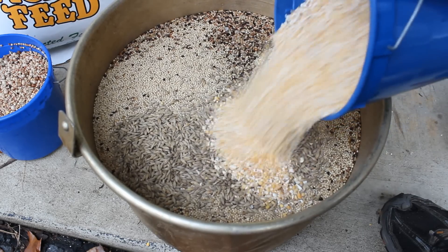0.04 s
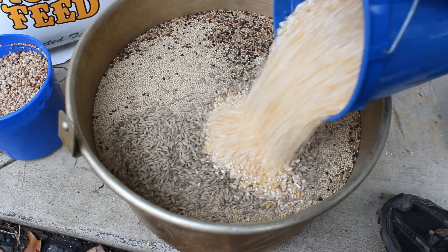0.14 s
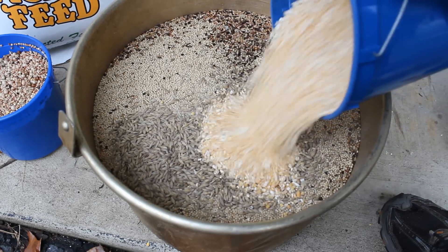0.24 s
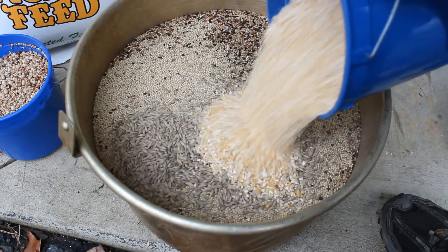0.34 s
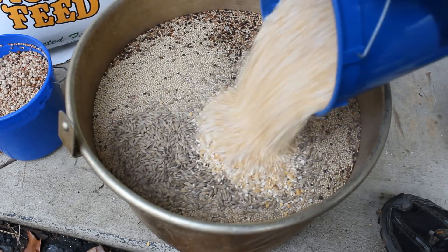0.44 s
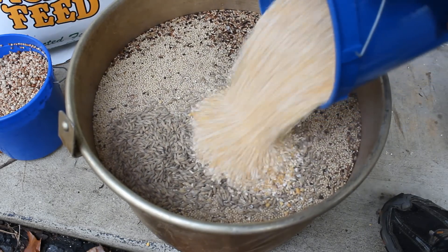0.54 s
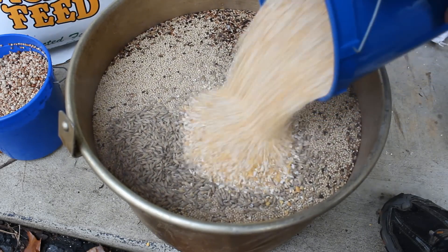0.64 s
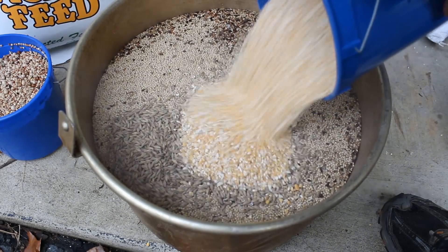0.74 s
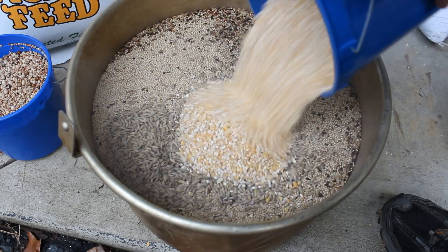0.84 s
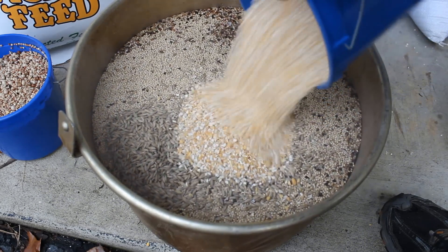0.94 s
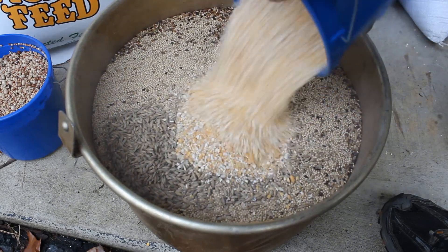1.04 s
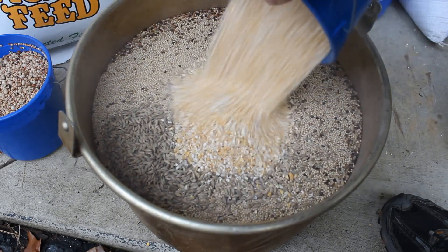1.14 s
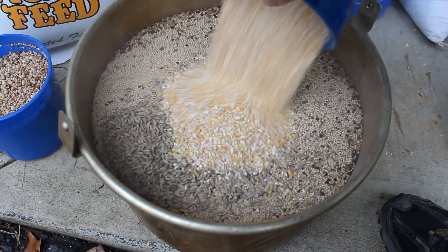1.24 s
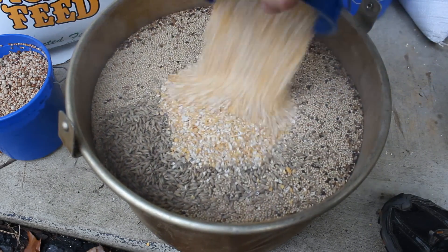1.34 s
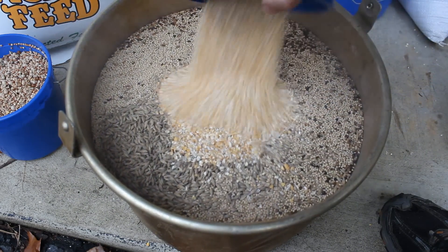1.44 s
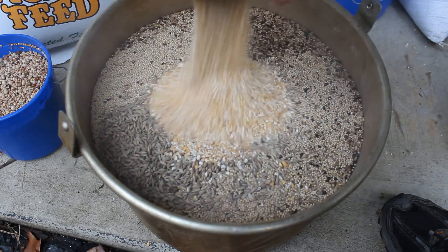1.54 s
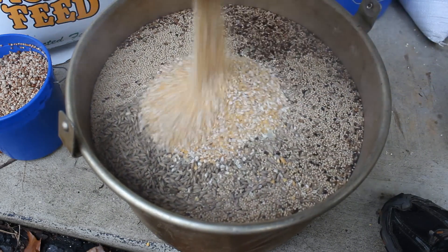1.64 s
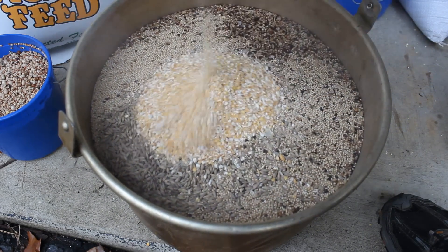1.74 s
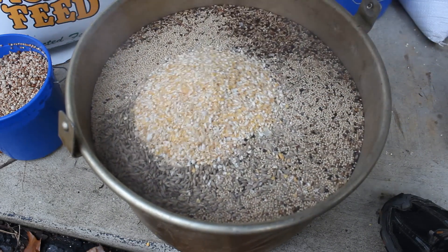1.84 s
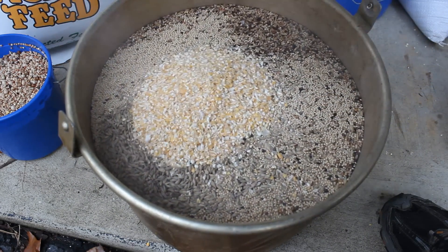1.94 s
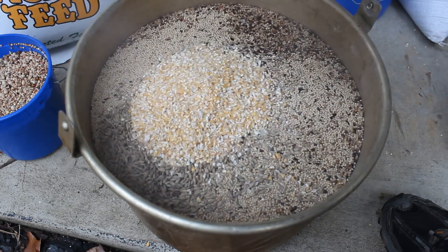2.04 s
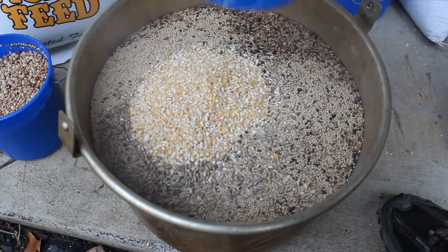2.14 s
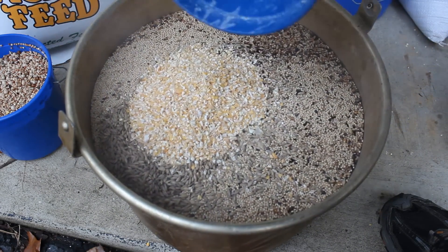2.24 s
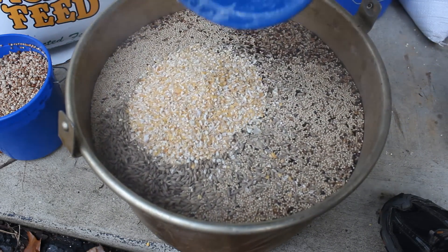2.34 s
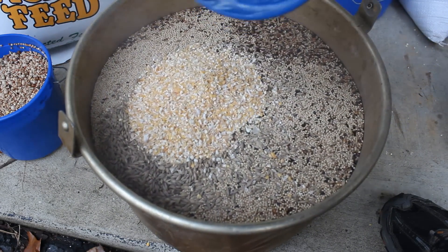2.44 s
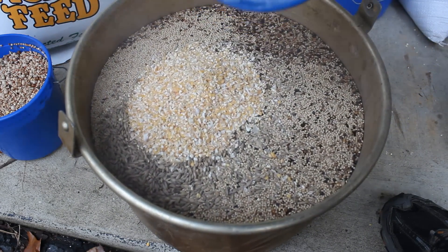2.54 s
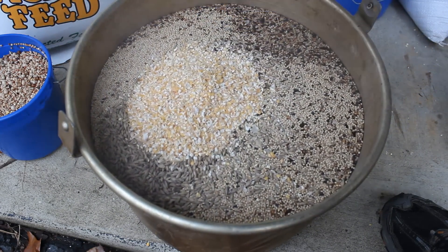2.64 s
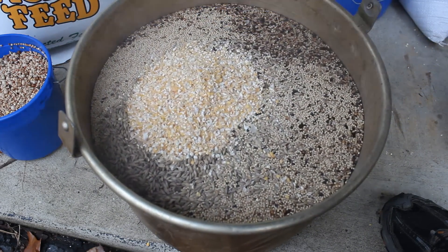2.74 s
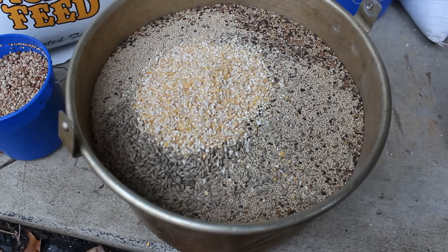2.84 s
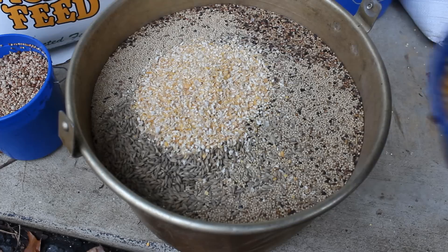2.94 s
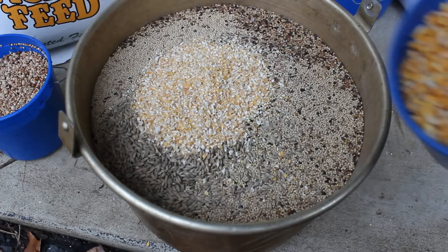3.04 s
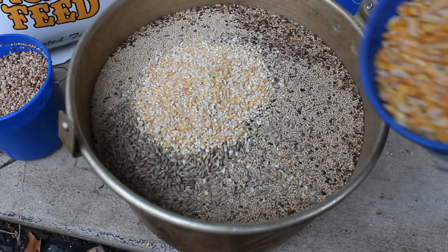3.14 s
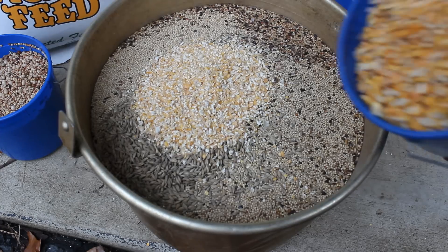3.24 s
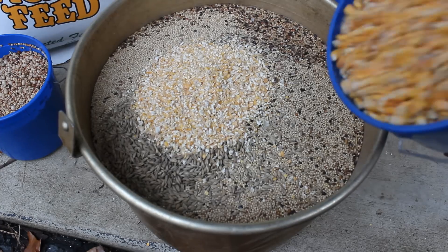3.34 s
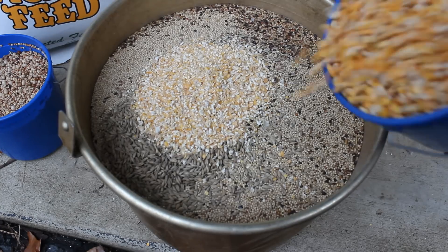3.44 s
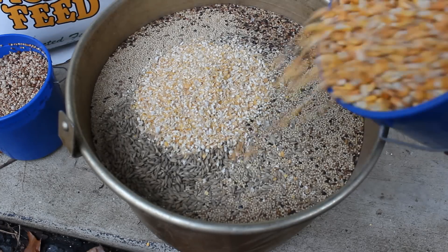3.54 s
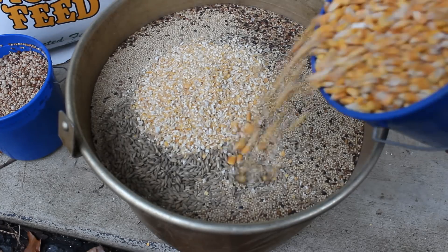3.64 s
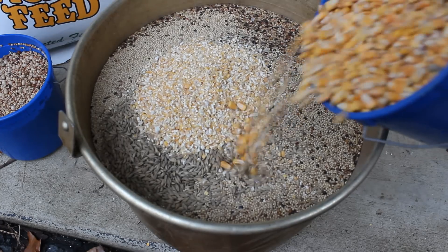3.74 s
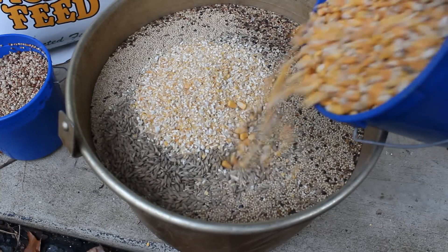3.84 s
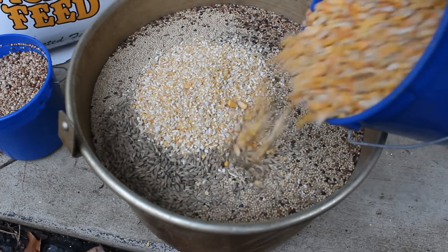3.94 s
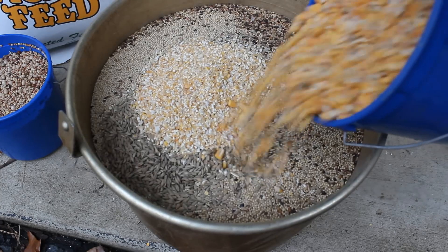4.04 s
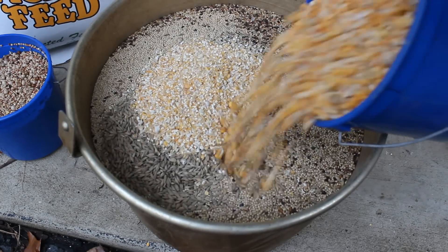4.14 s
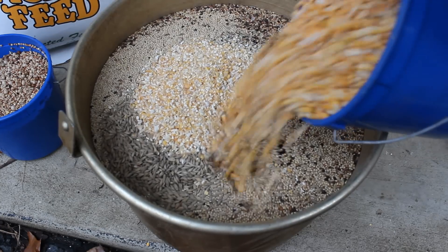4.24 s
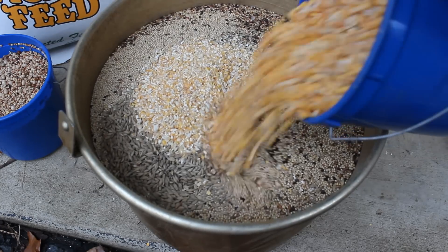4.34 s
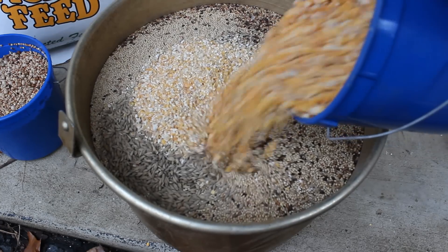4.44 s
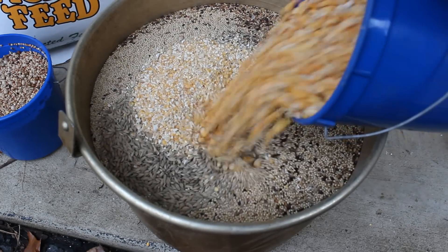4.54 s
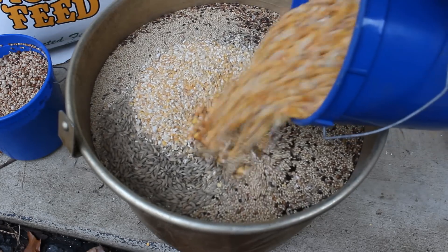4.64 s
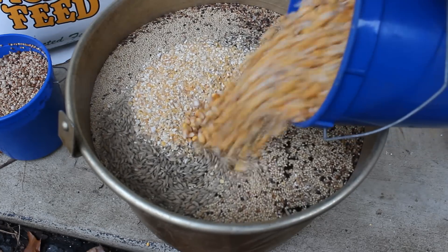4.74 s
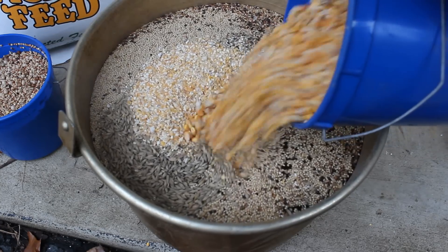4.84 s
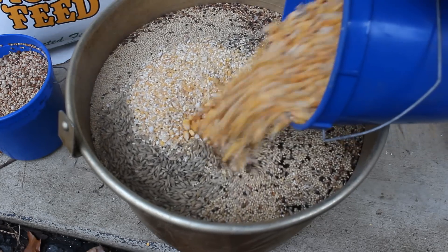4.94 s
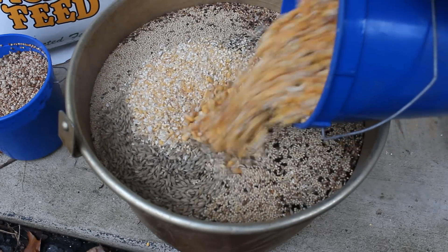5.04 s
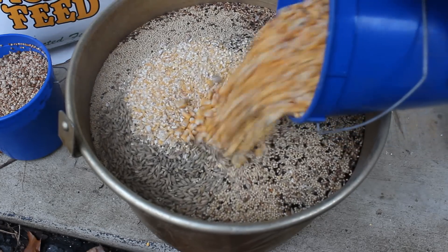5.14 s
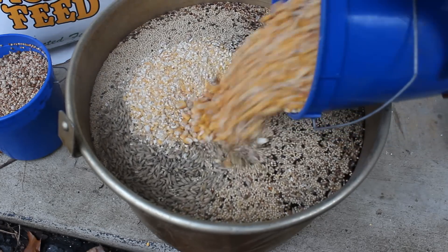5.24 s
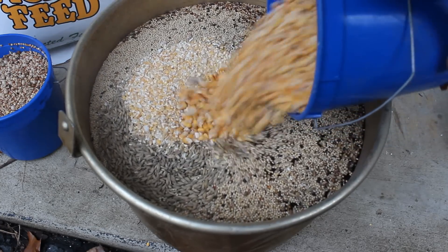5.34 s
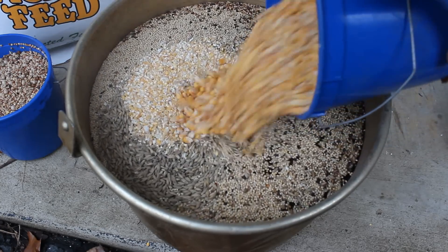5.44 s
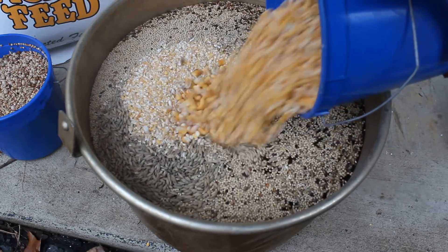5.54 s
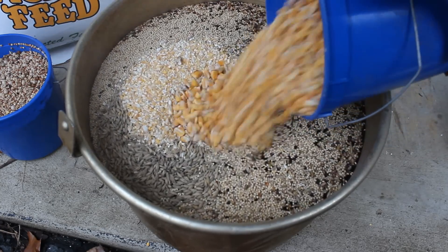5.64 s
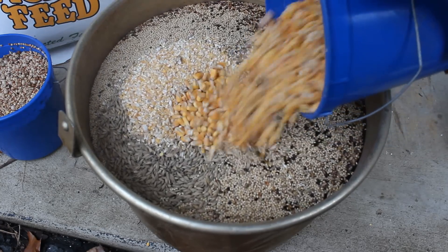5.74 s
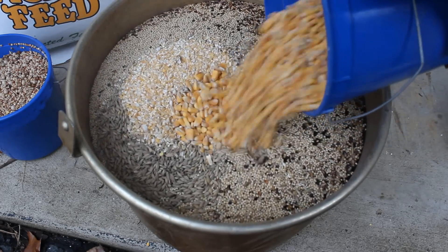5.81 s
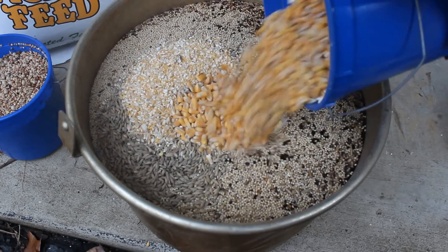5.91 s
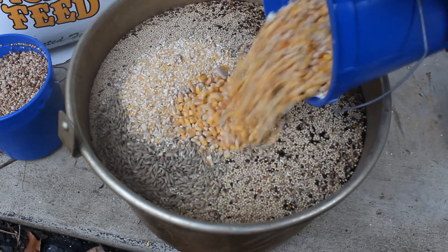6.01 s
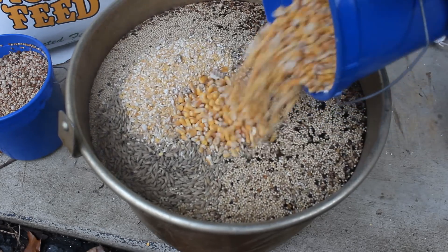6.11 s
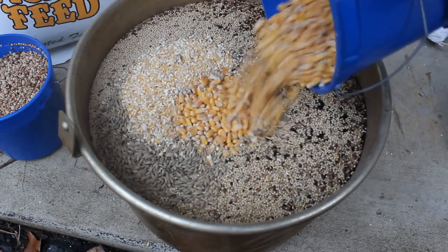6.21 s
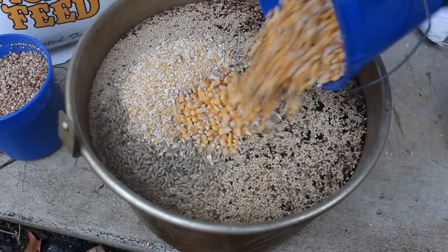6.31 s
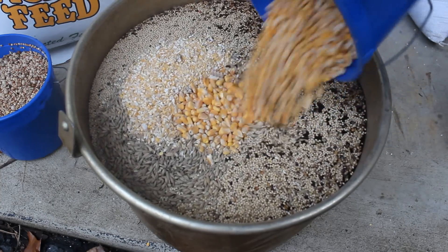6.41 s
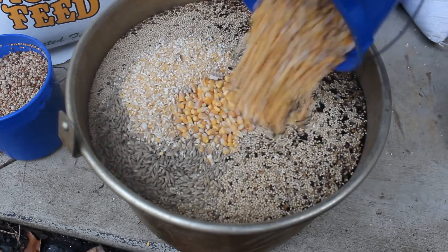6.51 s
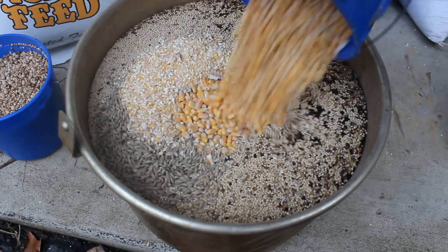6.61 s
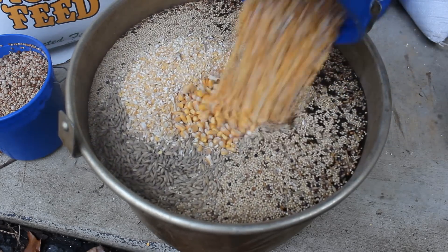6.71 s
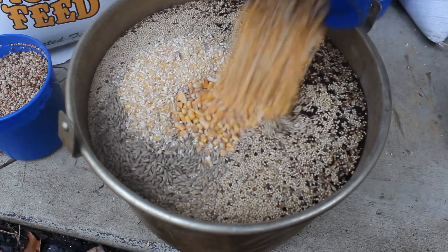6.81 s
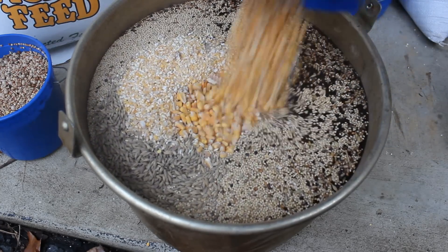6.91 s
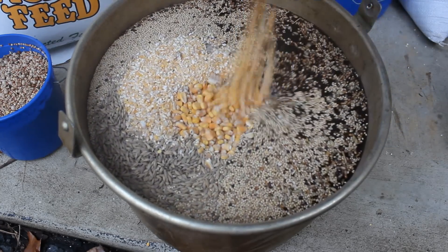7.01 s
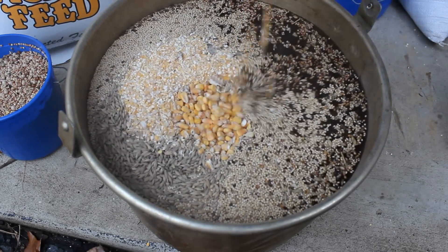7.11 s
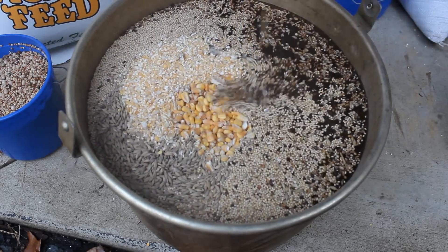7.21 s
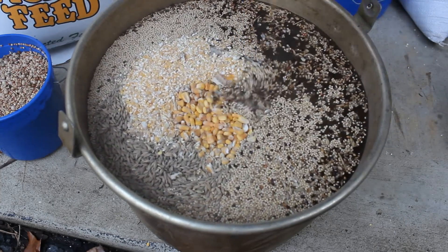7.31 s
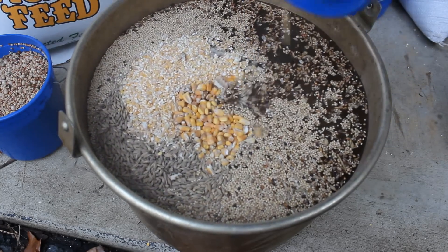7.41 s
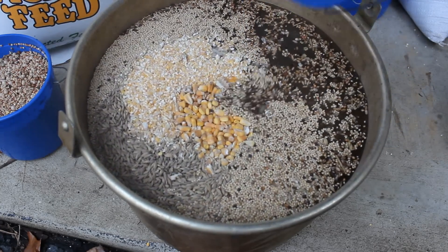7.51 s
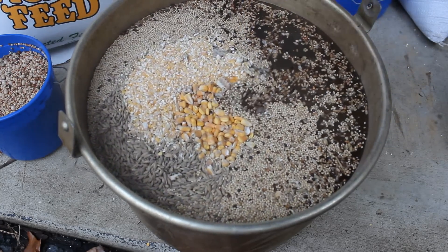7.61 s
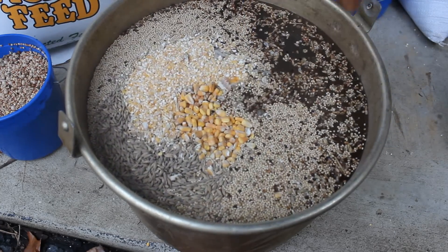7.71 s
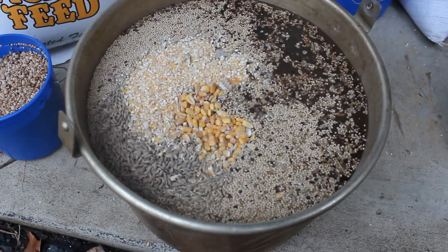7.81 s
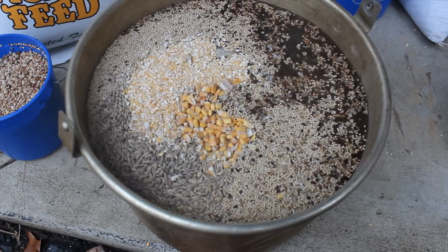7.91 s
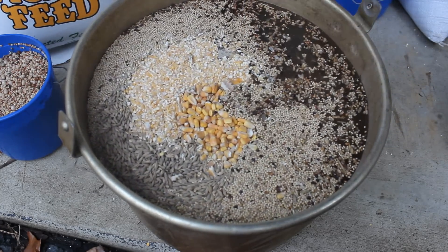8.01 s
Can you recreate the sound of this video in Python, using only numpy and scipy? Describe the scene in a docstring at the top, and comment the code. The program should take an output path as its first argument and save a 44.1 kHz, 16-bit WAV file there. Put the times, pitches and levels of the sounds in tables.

```python
"""A hissing pour of cracked grain slides down a plastic bucket into a metal pot half full of seed, which hums on.
A second bucket of whole kernels follows, coarser and more rattling; loose kernels knock about between pours.
Grain is filtered noise blurred over countless tiny damped rings; knocks ring the wall modes of the bucket.
Crickets (a drifting narrow band) and far traffic (filtered noise) fill the yard; one microphone with a limiter."""
import sys
import numpy as np
from scipy import signal
from scipy.fft import rfft, irfft, next_fast_len
from scipy.io import wavfile
from scipy.ndimage import uniform_filter1d, minimum_filter1d, map_coordinates

SR = 44100
rng = np.random.default_rng(int(sys.argv[2]) if len(sys.argv) > 2 else 0)


def waveform_to_disk(signal):
    """Save audio, clipped to [-1, 1], as 16-bit WAV at the path in sys.argv[1]."""
    frames = np.transpose(np.atleast_2d(signal))
    scaled = np.clip(frames, -1, 1) * 32767
    samples = np.round(scaled).astype(np.int16)
    wavfile.write(sys.argv[1], SR, samples)


def to_linear_factor(level_db):
    """Convert decibel levels (scalar or array-like) to linear amplitude factors."""
    exponent = np.asarray(level_db, float) / 20
    return 10 ** exponent


N = 355754  # length in samples


def unit(x):
    """Scaled to rms 1."""
    return x / np.sqrt(np.mean(x ** 2) + 1e-20)


def curves(rows):
    """One value per sample for each column after the time."""
    start_s, *columns = np.transpose(rows)
    return [np.interp(np.arange(N) / SR, start_s, column) for column in columns]


def wobble(rate):
    """A smooth random curve, rate knots a second."""
    knots = rng.standard_normal(400 + N // 100)
    return map_coordinates(knots, [np.arange(N) * rate / SR])


def coloured(x, spectrum):
    """x through a causal (minimum-phase) filter with the (Hz, dB) spectrum."""
    size = 2 * next_fast_len(N // 2 + 4096)
    hz, db = np.transpose(spectrum)
    bins_hz = np.fft.rfftfreq(size, 1 / SR)
    gain_db = np.interp(np.log(bins_hz + 1), np.log(hz + 1), db)
    cepstrum = irfft(np.log(to_linear_factor(gain_db)), size)
    # folding the cepstrum forward makes the filter causal
    cepstrum[1:size // 2] *= 2
    cepstrum[size // 2 + 1:] = 0
    return irfft(rfft(x, size) * np.exp(rfft(cepstrum)), size)[:N]


def noise(spectrum):
    """Steady noise of rms 1 with the (Hz, dB) spectrum."""
    return unit(coloured(rng.standard_normal(N), spectrum))


def tone(hz, width_hz, drive):
    """A moving resonance: the drive, smoothed to the width, carried at the pitch."""
    lowpass = [(0, 0), (width_hz / 2, -3), (3 * width_hz, -22), (20000, -60)]
    slow = [coloured(drive * rng.choice([-1, 1], N), lowpass) for _ in "ab"]
    phase = 2 * np.pi * np.cumsum(hz) / SR
    return unit(slow[0] * np.cos(phase) + slow[1] * np.sin(phase))


def kernels(count, low_hz, high_hz, turns, spread_db):
    """Scattered collisions, each a damped ring of a few cycles at its own pitch and size."""
    when, pitch, size = rng.random((3, count, 1))
    hz = low_hz * (high_hz / low_hz) ** pitch
    k = np.arange(160)
    ring = np.sin(2 * np.pi * hz * k / SR) * np.exp(-hz * k / SR / turns)
    # high rings are short, so louder for an even spectrum; a few collisions are far bigger than the rest
    ring *= hz / low_hz * to_linear_factor(-spread_db * np.log(size + 0.045))
    place = (when * N + k).astype(int)
    return unit(np.bincount(place.ravel(), ring.ravel())[:N])


def stream(single, grains, spectrum):
    """A blur of countless contacts with single kernels standing out of it."""
    single = np.clip(single, 0, 1)
    blur = np.sqrt(1 - single) * noise(spectrum)
    return blur + np.sqrt(single) * unit(coloured(grains, spectrum))


# spectrum of the far traffic and air: hz [Hz], level_db [dB]
YARD_SPECTRUM = [(20, -31), (55, -5), (105, -1.5), (150, -9), (225, -6.5), (350, -11), (760, -12),
                 (1200, -17), (2000, -21.5), (3000, -23.5), (5000, -55), (9000, -41), (16000, -42)]
# heard level of the traffic and air, which dips twice during the second pour: start_s [s], level_db [dB]
YARD_LEVEL = [(0.0, -42), (3.39, -41.5), (4.72, -46.5), (5.73, -40), (7.05, -46), (7.86, -40), (8.07, -42)]
# drift of the cricket band: start_s [s], pitch_hz [Hz]
CRICKET_PITCH = [(2, 4300), (2.3, 4100), (2.6, 4180), (3.05, 4140)]


def yard():
    """Far traffic and air, and crickets shimmering in a narrow band that drifts."""
    level_db, pitch_hz = curves(YARD_LEVEL)[0], curves(CRICKET_PITCH)[0]
    air = to_linear_factor(level_db + 0.59 * wobble(6.8)) * noise(YARD_SPECTRUM)
    shimmer_db = -53 + 1.8 * wobble(40)
    return air + to_linear_factor(shimmer_db) * tone(pitch_hz, 300, np.ones(N))


# wall modes of the metal pot: pitch_hz [Hz], level_db [dB, before the fade-in], t60_s [s]
POT_MODES = [(488, -43, 5.5), (557, -51, 4.5)]


def pot():
    """The last of the cracked grain lands at once and shakes the metal wall, which hums on, wavering a little."""
    slump_s, fade_in_s = 1.74, 0.03
    t = np.clip(np.arange(N) / SR - slump_s, 0, None)
    hum = np.zeros(N)
    for pitch_hz, level_db, t60_s in POT_MODES:
        hum += to_linear_factor(level_db - 60 * t / t60_s + 0.85 * wobble(2.5)) * np.sin(2 * np.pi * pitch_hz * t)
    return hum * (1 - np.exp(-t / fade_in_s))


# a bucket bumped by hand: start_s [s], level_db [dB, of the four-note drum before it decays]
HAND_THUMPS = [(2.869, -24), (3.183, -19.5), (3.25, -23)]


def thumps():
    """A hand on the bucket gives a dull, short drum note."""
    out, t = np.zeros(N + SR), np.arange(SR // 8) / SR
    drum = np.mean([np.sin(2 * np.pi * hz * t) for hz in (402, 467, 630, 723)], axis=0)
    for start_s, level_db in HAND_THUMPS:
        out[round(start_s * SR):][:len(t)] += to_linear_factor(level_db - 60 * t / 0.052) * drum
    return out[:N]


# kernels on kernels, heard singly: start_s [s], level_db [dB, click peak before colouring]
KERNEL_TICKS = [(2.3535, -27), (2.3735, -32), (2.403, -35), (2.524, -41), (2.544, -38), (2.8714, -15),
                (3.3284, -42), (3.6765, -36), (3.7262, -26), (3.766, -24), (3.7824, -18.5), (3.7976, -18.5),
                (3.819, -19), (3.8412, -29), (3.8584, -22), (3.876, -19.5), (3.917, -27), (3.9426, -15),
                (4.204, -19.5), (4.317, -13), (4.4625, -21), (4.5156, -16), (4.631, -15), (6.3919, -14),
                (7.307, -24), (7.324, -34), (7.367, -32), (7.4483, -24), (7.5495, -30), (7.8224, -35)]
# the first kernels over the rim: start_s [s], length_s [s], level_db [dB, about the loudest click]
RIM_DRIBBLE = (4.3, 0.92, -26)


def ticks():
    """Hard kernels meeting in the air or on the heap: a bright click with a faint skitter."""
    scatter_db, contact_db = 8, -32.5  # spread of the dribble, the tick that starts each single knock
    out, t = np.zeros(N + SR), np.arange(SR // 40) / SR
    dribble_s, length_s, top_db = RIM_DRIBBLE
    dribble = [(dribble_s + length_s * u, top_db + scatter_db * np.log(v + 0.01))
               for u, v in rng.random((24, 2))]
    contacts = [(start_s, level_db + contact_db) for start_s, level_db, _ in SINGLE_KNOCKS]
    for start_s, level_db in KERNEL_TICKS + dribble + contacts:
        envelope = to_linear_factor(-60 * t / 0.003) + 0.2 * to_linear_factor(-60 * t / 0.03)
        click = envelope * rng.choice([-1, 1], len(t))
        out[round(start_s * SR):][:len(t)] += to_linear_factor(level_db) * click / np.abs(click).max()
    return coloured(out[:N], PATTER_SPECTRUM)


# kernels and handle on plastic: start_s [s], level_db [dB, peak before colouring], loudest_hz [Hz]
SINGLE_KNOCKS = [(1.8457, -27, 4020), (1.9487, -25, 1090), (2.311, -17.5, 3600), (2.342, -14, 1920),
                 (2.376, -13.5, 4150), (2.4026, -21, 2770), (2.4398, -28, 3320), (2.4748, -31, 2970),
                 (2.662, -22, 3790), (2.726, -21, 2650), (2.7894, -25, 3040), (2.8723, -0.5, 2040),
                 (2.9136, -18.5, 3000), (2.9426, -5.5, 1150), (3.185, -19.5, 1090), (3.2512, -21.5, 1405),
                 (3.353, -13, 3230), (3.361, -9, 2660), (3.3827, -16, 2660), (3.4173, -2, 2740),
                 (3.4332, -3, 2680), (3.4506, 2, 2680), (3.486, -4, 2830), (3.4966, -2.5, 2790),
                 (3.5499, -4.5, 3260), (3.5669, -10, 3030), (3.595, -13, 2920), (3.677, -8, 2220),
                 (3.751, -11, 2780), (3.783, -12.5, 4080), (3.797, -16, 4270), (4.187, -8, 2820),
                 (4.1999, -4.5, 2530), (4.3158, -13, 3700), (4.491, -14, 2950), (4.5026, -6.5, 3280),
                 (4.6044, -8.5, 3040), (4.648, -8, 2890), (4.756, -11, 3800), (7.315, -4, 2430),
                 (7.351, -8.5, 3320), (7.3582, -0.5, 3370), (7.3659, -2, 2900), (7.406, -10, 3350),
                 (7.42, -2, 2970), (7.4496, -10.5, 2780), (7.4858, -9, 2400), (7.495, -3, 1174),
                 (7.67, -18, 3540), (7.7413, -18, 3060), (7.7596, -9.5, 3270), (7.7705, -7, 3240),
                 (7.808, -4, 2060), (7.864, -15, 3090), (7.875, -15, 3090), (7.9047, -6.5, 3120),
                 (7.943, -14, 996), (7.9937, -17.5, 2650), (8.0008, -8, 1016), (8.0525, -18, 2580),
                 (8.0624, -14, 1940)]
# loose kernels shaken in a bucket: start_s [s], length_s [s], rustle_db [dB],
# knock_db [dB, about the loudest knock], ringing_hz [Hz]
RATTLES = [(2.326, 0.16, -40, -14.5, 3100), (2.495, .33, -48.5, -25, 3100), (3.358, .3, -29, -12, 2690),
           (4.052, .8, -53, -17, 3100), (7.27, 0.33, -34.5, -19, 1200), (7.715, 0.28, -47, -28, 2900)]


def blows():
    """The single knocks, and a random handful for each rattle."""
    scatter_db = 8
    hits = list(SINGLE_KNOCKS)
    for start_s, length_s, _, knock_db, ringing_hz in RATTLES:
        for u, v, w in rng.random((12, 3)):
            level_db = knock_db + scatter_db * np.log(v + 0.011)
            hits.append((start_s + length_s * u, level_db, ringing_hz * (0.96 + 0.4 * w)))
    return hits


# wall modes of the plastic bucket: pitch_hz [Hz], level_db [dB], both varied at each blow
BUCKET_MODES = [(1000, 0), (1200, 14.5), (1500, 16.5), (2020, 21.5), (2430, 13.5), (2770, 22), (3270, 18.5),
                (3600, -1), (4200, -3), (4850, 4), (5300, -44), (6600, -18)]
# a light kernel moves little low air: hz [Hz], level_db [dB]
CLACK_SPECTRUM = [(200, -14), (700, -11.5), (1000, -6), (5000, 4.5), (8000, -3), (16000, -16)]


def knocks(hits):
    """Each blow is a sharp contact and a short rattle, ringing the damped wall modes near its loudest pitch."""
    out, t = np.zeros(N + SR), np.arange(SR // 12) / SR
    mode_hz, mode_db = np.transpose(BUCKET_MODES)[:, :, None]
    for start_s, level_db, loudest_hz in hits:
        near_db = -5 * np.abs(np.log2(mode_hz / loudest_hz))
        vary_level, vary_pitch = rng.standard_normal((2, len(BUCKET_MODES), 1))
        # high modes die sooner: t60 is 28 / Hz seconds
        ring = to_linear_factor(mode_db + near_db + 3.5 * vary_level - 60 * t * mode_hz / 28)
        ring = ring * np.sin(2 * np.pi * mode_hz * (1 + 0.04 * vary_pitch) * t)
        envelope = to_linear_factor(-60 * t / 0.0024) + 0.41 * to_linear_factor(-60 * t / 0.043)
        rattle = envelope * rng.choice([-1, 1], len(t))
        blow = signal.fftconvolve(rattle, ring.sum(0))[:len(t)] + 0.22 * rattle
        out[round(start_s * SR):][:len(t)] += to_linear_factor(level_db) * blow / np.abs(blow).max()
    return coloured(out[:N], CLACK_SPECTRUM)


# low spectrum of the heap under the falling stream: hz [Hz], level_db [dB]
THUD_SPECTRUM = [(150, -31), (330, -15), (450, 3.5), (600, -5.5), (800, -2), (1200, -44)]


def thud(patter_db, thick, clumps):
    """The weight of the stream thuds on the heap, far more when it is thick."""
    level_db = patter_db - 24 + 24 * thick + 0.98 * clumps
    return to_linear_factor(level_db) * noise(THUD_SPECTRUM)


# bright spectrum of kernel on kernel: hz [Hz], level_db [dB]
PATTER_SPECTRUM = [(1500, -25), (4000, 11.5), (7000, 12.5), (10000, 8), (13000, 10), (15800, 10),
                   (18000, 9.5)]


def patter(single):
    """Kernels fall on the heap in tiny bright clicks."""
    grains = kernels(count=11000, low_hz=5300, high_hz=15900, turns=0.79, spread_db=4.0)
    return stream(single, grains, PATTER_SPECTRUM)


# air in the bucket: hz [Hz], level_db [dB]
HOLLOW_SPECTRUM = [(500, -30.5), (850, -3), (1150, 1), (1500, -0.5), (2000, -0.5), (3000, -55)]


def hollow(single, slide, air_hz, air_db):
    """The air in the bucket booms softly behind the slide, with one tone that the slide drives."""
    grains = kernels(count=4000, low_hz=860, high_hz=1890, turns=2.0, spread_db=2.5)
    return stream(single, grains, HOLLOW_SPECTRUM) + to_linear_factor(air_db) * tone(air_hz, 130, slide)


# kernels rubbing on plastic: hz [Hz], level_db [dB]
SLIDE_SPECTRUM = [(900, -30.5), (1700, -15.5), (2400, -5.5), (3250, -5), (4300, -8.5), (5500, -14),
                  (7500, -20.5), (11000, -65), (16000, -26)]


def rubbing(single):
    """Kernels slide over the plastic in a hiss of small rings."""
    grains = kernels(count=9000, low_hz=1410, high_hz=7160, turns=1.65, spread_db=4.0)
    return stream(single, grains, SLIDE_SPECTRUM)


def sliding(rub, second, wall_hz, wall_db):
    """The rubbing sets two wall tones ringing; cracked grain is smaller and hisses higher."""
    wall = tone(wall_hz, 170, rub) + 0.47 * tone(0.72 * wall_hz, 190, rub)
    slide = rub + to_linear_factor(wall_db) * wall
    fine = to_linear_factor(-8.5) * tone(np.full(N, 5010), 1500, slide)
    return slide + (1 - second) * fine


# one row a bucket, when full and when empty: wall_hz [Hz], wall_db [dB against the slide],
# air_hz [Hz], air_db [dB against the hollow]
FULL_TONES = [(3000, -11, 1150, -20), (3045, -11.5, 1520, -5.5)]
EMPTY_TONES = [(3476, -3.5, 1180, 2.5), (3116, -6.5, 1190, -3.5)]
# one row a bucket: full_db, empty_db [dB, hollow against the slide],
# lone [share of single kernels in a thin stream, 0-1]
GRAIN_KINDS = [(-5.5, -12.5, 0.27), (-9, -4.5, 0.92)]
# one row a bucket, the time it drains: start_s [s], end_s [s]
DRAIN_TIMES = [(0, 1.75), (4, 7.1)]


def draining(second):
    """As a bucket empties its tones and hollow change; the tone levels change most near the end of a pour."""
    t = np.arange(N) / SR
    start_s, end_s = np.array(DRAIN_TIMES)[second].T
    emptied = np.clip((t - start_s) / (end_s - start_s), 0, 1)
    full, empty = np.array(FULL_TONES)[second].T, np.array(EMPTY_TONES)[second].T
    full_db, empty_db, lone = np.array(GRAIN_KINDS)[second].T
    wall_hz, air_hz = (full + (empty - full) * emptied)[::2]
    wall_db, air_db = (full + (empty - full) * emptied ** 5.2)[1::2]
    hollow_db = full_db + (empty_db - full_db) * emptied
    return wall_hz, wall_db, air_hz, air_db, hollow_db, lone


# one list a pour: start_s [s], slide_db [dB, on plastic], patter_db [dB, fall on the heap],
# thick [thickness of the stream, 0-1]
POUR_COURSES = [
    [(0, -39, -36.5, 0.3), (.31, -41.5, -40.5, 0.3), (.5, -37, -39.5, 0.4), (.6, -31.5, -36, 0.57),
     (.96, -30.5, -36.5, 0.64), (1.3, -21, -29.5, 0.56), (1.62, -23.5, -29, 0.47), (1.77, -29, -36, 0.73),
     (1.88, -59.5, -46.5, 0), (2.02, -63, -62, 0.2)],
    [(3.1, -55, -63, .5), (3.3, -52, -50, 0.3), (3.39, -36, -43, 0), (3.5, -18.5, -28, 0.07),
     (3.62, -30, -44, 0), (3.79, -34, -37, 0.24), (4.11, -30, -37, 0.18), (4.25, -25, -26.5, 0.33),
     (4.72, -24.5, -26.5, 0.24), (5.12, -22, -23, 0.41), (5.39, -18.5, -21.5, 0.54), (6.07, -17, -20, 0.56),
     (6.42, -23, -26, 0.68), (6.62, -17, -23, 0.79), (6.85, -16, -22, 0.71), (7.01, -14.5, -22.5, 0.63),
     (7.12, -18, -22.5, 0.56), (7.26, -29.5, -30, 0.09), (7.37, -54, -60, .3), (7.56, -53, -56, 0.2),
     (7.64, -38, -46, 0.7), (7.76, -52, -63, 0.6)],
]


def pour():
    """The flow comes in clumps, so all its sounds surge together, more so when it thins out."""
    t = np.arange(N) / SR
    slide_db, patter_db, thick = curves(sum(POUR_COURSES, []))
    second = (t > POUR_COURSES[1][0][0]).astype(int)  # 0 in the first pour, 1 in the second
    wall_hz, wall_db, air_hz, air_db, hollow_db, lone = draining(second)
    single = np.clip(lone * (1 - thick), 0, 1)
    clumps = single * (1.3 * wobble(30) + 2.3 * wobble(80))  # dB

    # each rattle swells and fades as half a sine, ringing at its own pitch
    swells = np.array([to_linear_factor(rustle_db) * np.sin(np.pi * np.clip((t - start_s) / length_s, 0, 1))
                       for start_s, length_s, rustle_db, *_ in RATTLES])
    rustle = swells.sum(0)
    rub = rubbing(single)
    ringing_hz = np.array(RATTLES)[swells.argmax(0), -1]
    shaken = to_linear_factor(1.5 + clumps) * rustle * tone(ringing_hz, 150, rub)

    slide = sliding(rub, second, wall_hz, wall_db)
    boom = hollow(single, slide, air_hz, air_db)
    inside = to_linear_factor(clumps) * slide + to_linear_factor(hollow_db + 1.26 * clumps) * boom
    inside *= to_linear_factor(slide_db) + rustle
    fall = to_linear_factor(patter_db + 1.43 * clumps) * patter(single)
    return inside + shaken + fall + thud(patter_db, thick, clumps)


def scene():
    """Everything reaches one microphone, the same on both channels."""
    mix = yard() + pot() + thumps() + ticks() + knocks(blows()) + pour()
    return np.tile(mix, (2, 1))


def roll_off(x):
    """The treble ends steeply here."""
    return signal.sosfilt(signal.butter(12, 16990, fs=SR, output="sos"), x)


def record(dry):
    """A limiter ducks after loud blows and recovers within a tenth of a second; the treble ends steeply."""
    over_db = np.minimum(0, -7 - 20 * np.log10(np.abs(dry[0]) + 1e-9))  # negative above -7 dB
    # the origins make both windows look back in time
    held_db = minimum_filter1d(over_db, SR // 16, origin=SR // 32 - 1)
    gain_db = 0.5 * uniform_filter1d(held_db, SR // 50, origin=SR // 100 - 1)
    limited = coloured(dry[0] * to_linear_factor(gain_db), [(10, -4.5), (15750, 0.5), (16000, -34), (17000, -40)])
    mix = np.clip([limited, limited], -1, 1)
    return roll_off(mix)


dry = scene()
out = record(dry)
waveform_to_disk(out)
```